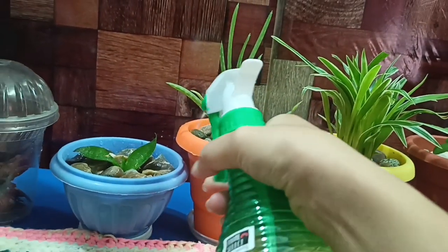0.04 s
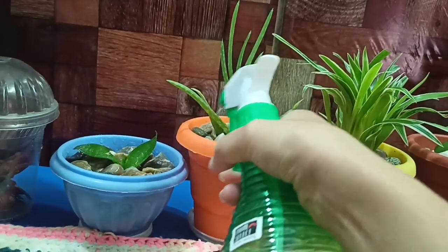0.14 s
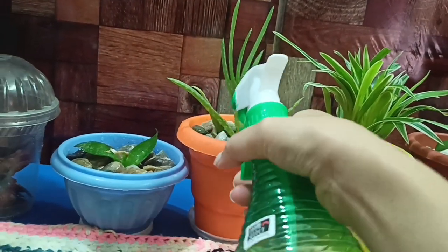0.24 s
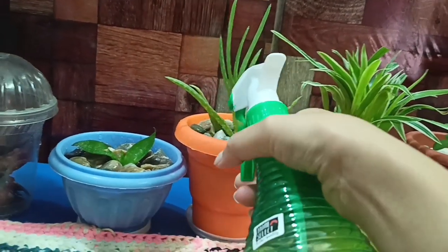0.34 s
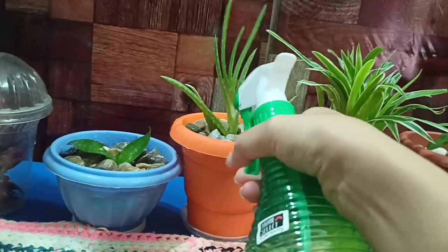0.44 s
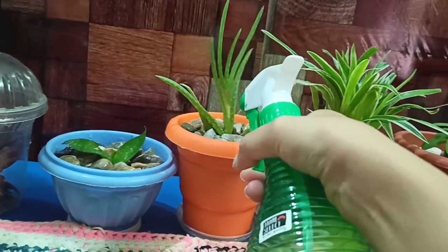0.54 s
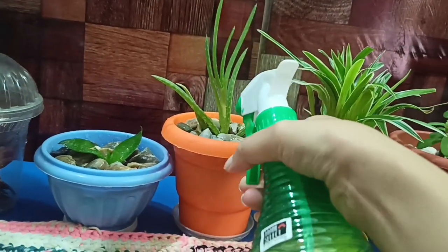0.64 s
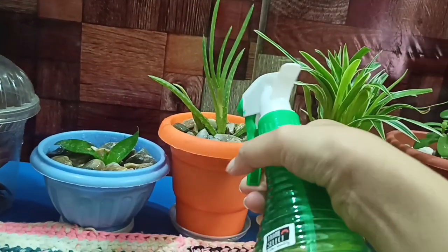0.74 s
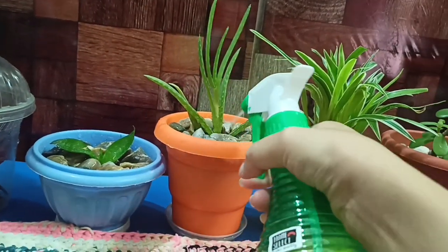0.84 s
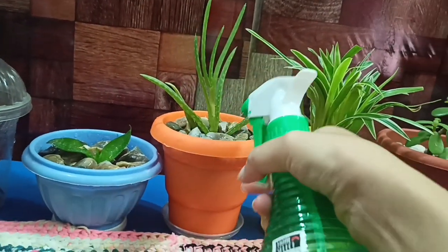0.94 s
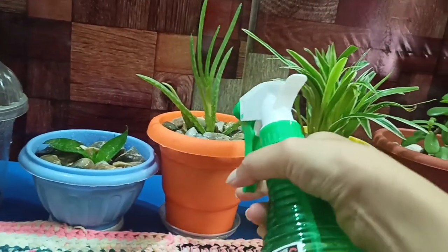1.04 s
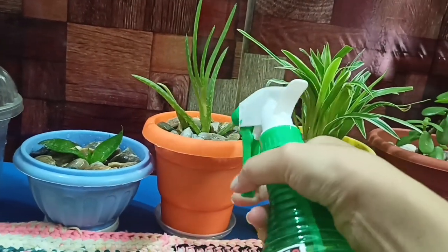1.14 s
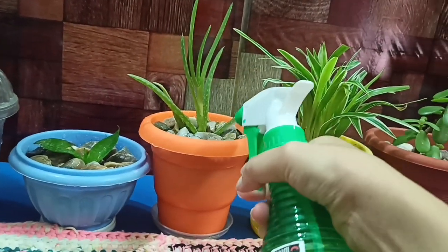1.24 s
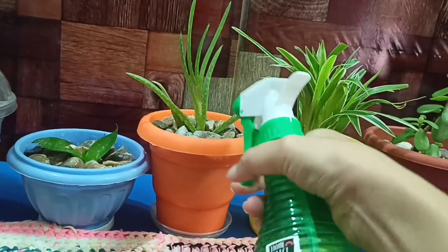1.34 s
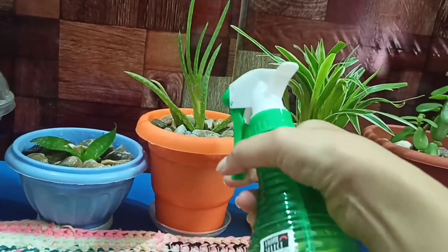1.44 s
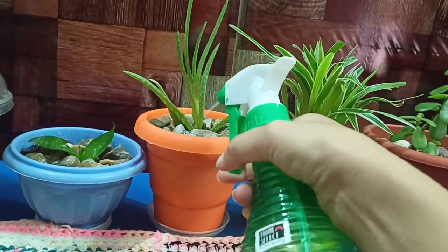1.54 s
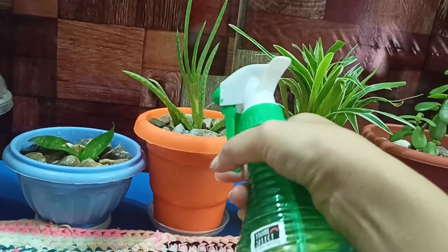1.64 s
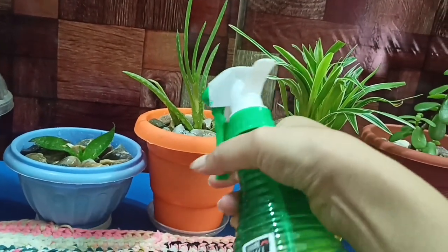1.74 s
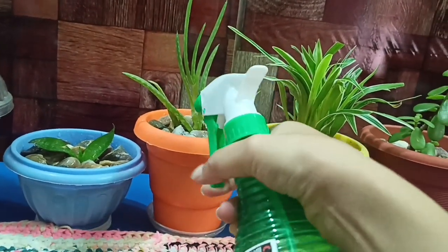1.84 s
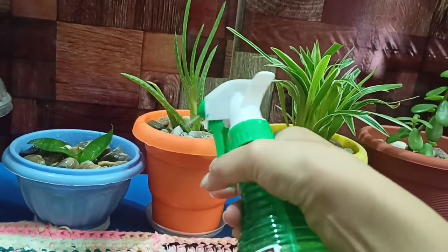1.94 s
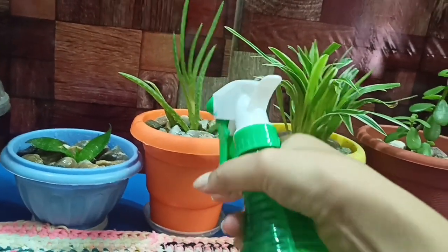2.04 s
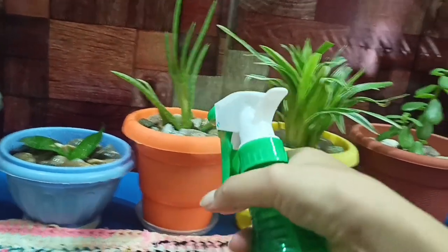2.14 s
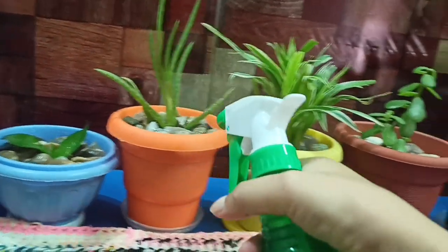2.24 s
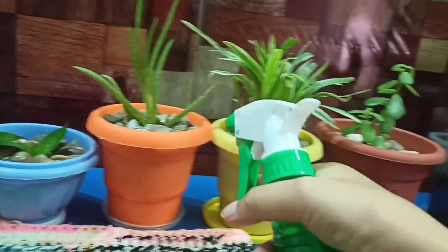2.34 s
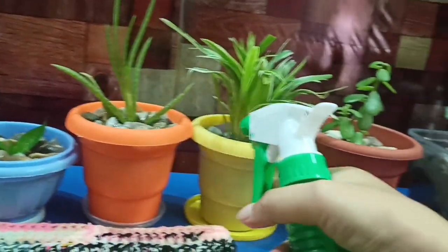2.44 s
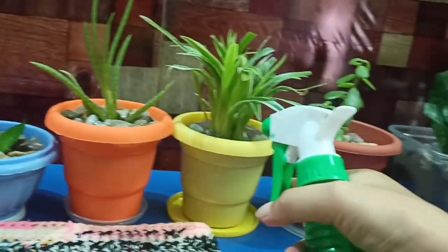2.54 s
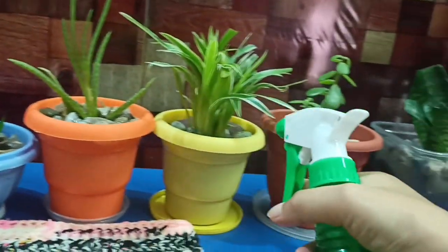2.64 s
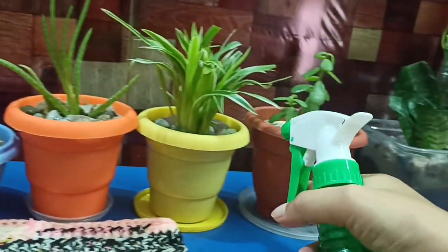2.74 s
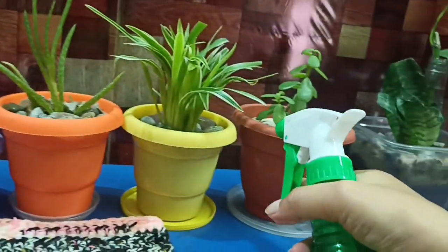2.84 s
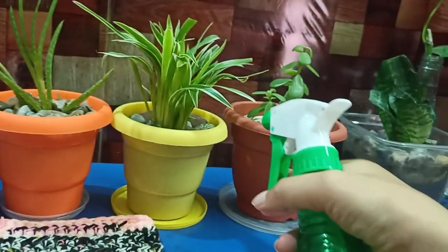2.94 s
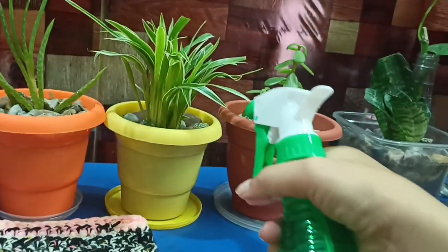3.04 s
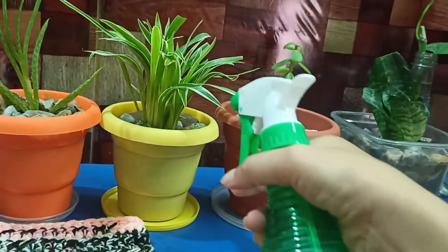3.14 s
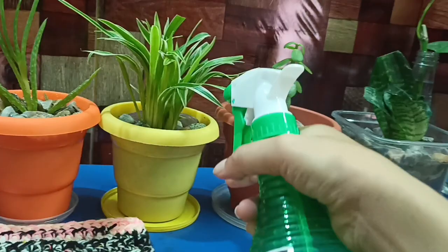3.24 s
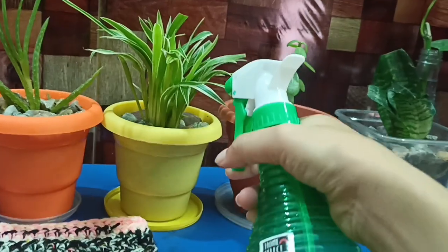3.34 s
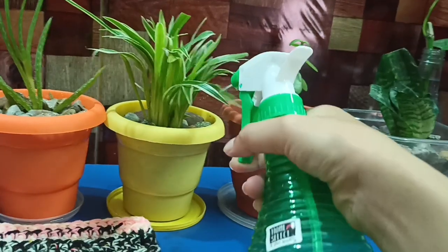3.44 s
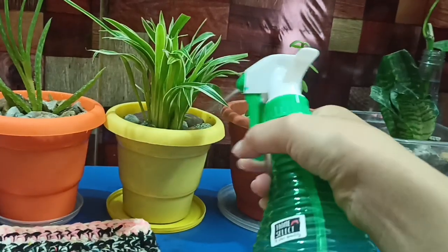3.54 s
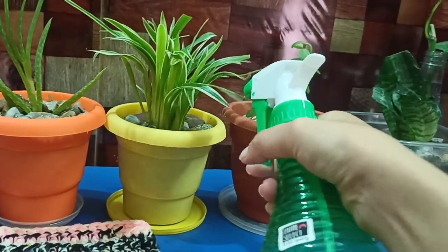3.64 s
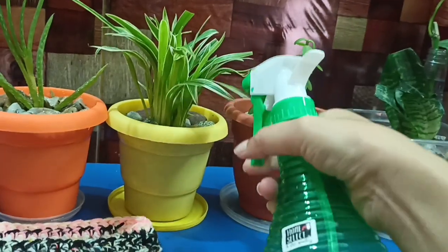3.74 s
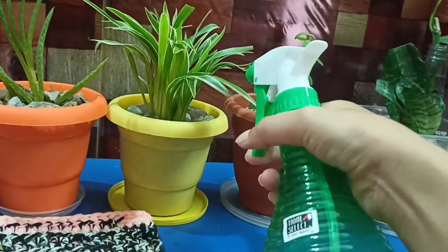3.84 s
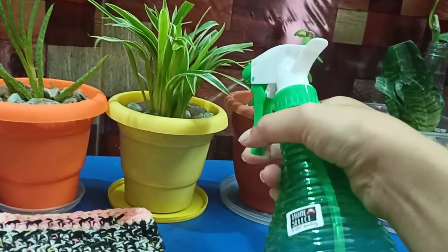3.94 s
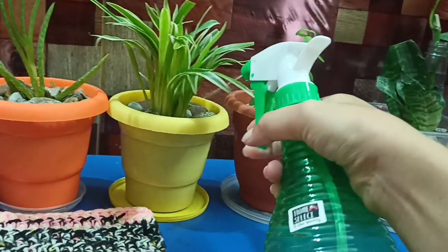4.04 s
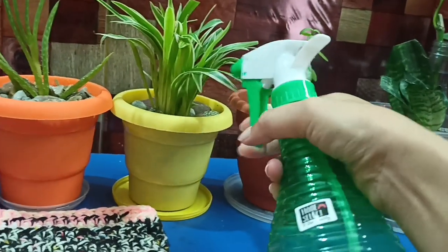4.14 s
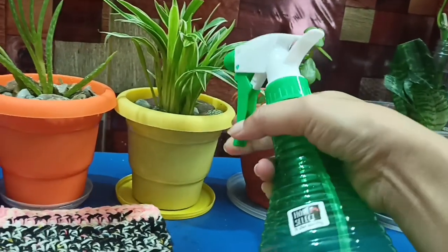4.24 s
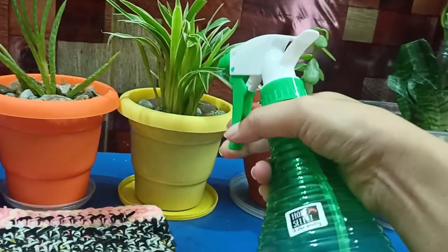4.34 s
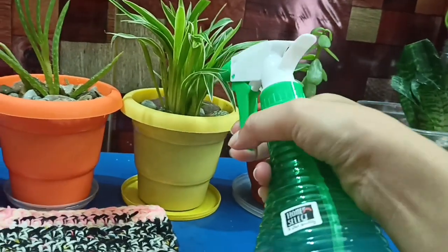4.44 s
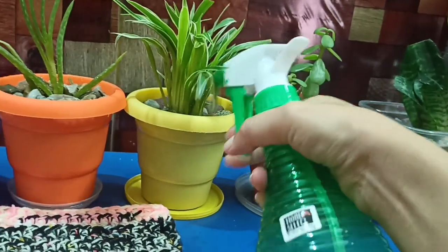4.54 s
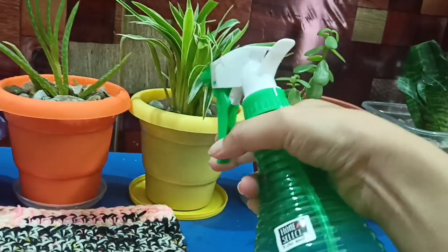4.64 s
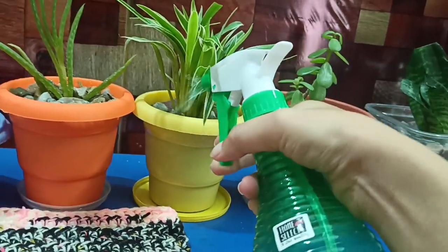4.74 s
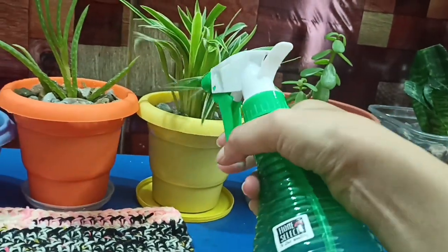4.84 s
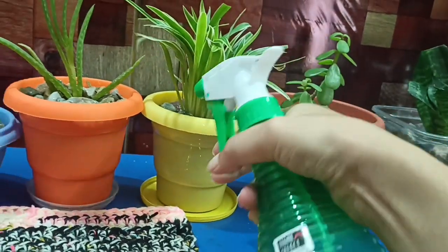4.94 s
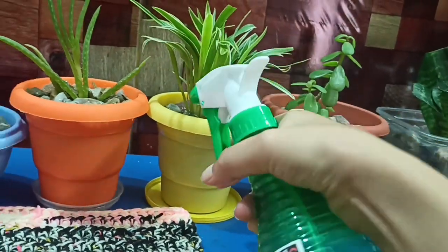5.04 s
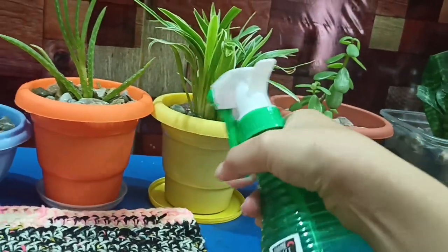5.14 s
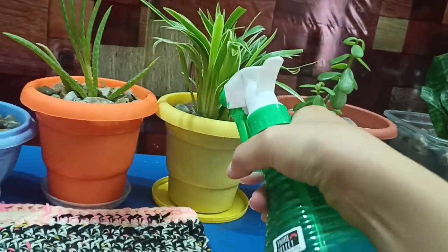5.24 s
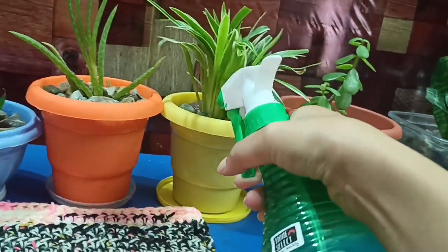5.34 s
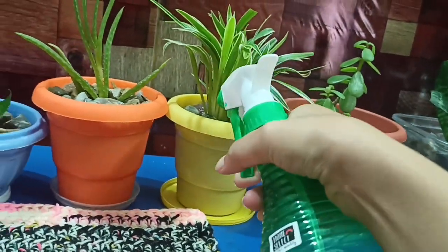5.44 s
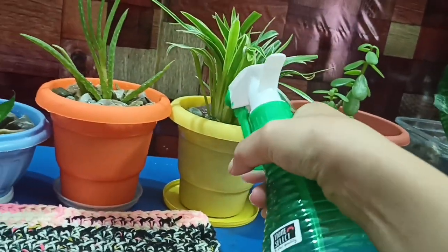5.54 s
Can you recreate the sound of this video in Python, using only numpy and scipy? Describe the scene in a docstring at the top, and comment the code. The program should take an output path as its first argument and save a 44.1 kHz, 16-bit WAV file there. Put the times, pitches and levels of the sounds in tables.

```python
"""Trigger sprayer on potted plants

A plastic trigger sprayer, held close to a phone's microphone, mists potted plants in a small room.
Trigger ticks are decaying sines with a rattle; the seal's slips are pulse trains that judder, then squeal;
nozzle hiss, wet splutter and two spells of patter on close leaves are shaped noise and random clicks.
Behind: mains hum, murmur and a far vehicle's drone; the phone turns the bass down when the treble is quiet."""
import sys
import numpy as np
from scipy import signal
from scipy.fft import rfft, irfft
from scipy.io import wavfile
from scipy.ndimage import uniform_filter1d

SR = 44100
rng = np.random.default_rng(int(sys.argv[2]) if len(sys.argv) > 2 else 0)


def nominal_scale(level):
    """Amplitude ratio for a level in decibels (scalar or array-like)."""
    x = np.asarray(level, float) / 20
    return 10 ** x


def generate_wav(signal):
    """Clip the signal to [-1, 1] and save it as 16-bit WAV at the path in sys.argv[1]."""
    frames = np.transpose(np.atleast_2d(signal))
    scaled = np.clip(frames, -1, 1) * 32767
    pcm = np.round(scaled).astype(np.int16)
    wavfile.write(sys.argv[1], SR, pcm)


N = 246519
T = np.arange(N) / SR


def unit(x):
    """Scale to rms 1."""
    return x / np.sqrt(np.mean(x ** 2))


def colour(x, points):
    """Causal minimum-phase filter through (Hz, dB) points, made by folding the cepstrum."""
    hz, db = np.transpose(points)
    log_gain = np.interp(np.log(np.arange(513) * SR / 1024 + 1), np.log(hz), db) * np.log(10) / 20
    fold = irfft(log_gain)
    fold[1:512] *= 2
    fold[513:] = 0
    return signal.fftconvolve(x, irfft(np.exp(rfft(fold))))[:N]


def noise(points):
    """Steady noise with the spectrum of (Hz, dB) points, rms 1."""
    hz, db = np.transpose(points)
    gain = nominal_scale(np.interp(np.log(np.fft.rfftfreq(N, 1 / SR) + 1), np.log(hz), db))
    return unit(irfft(rfft(rng.standard_normal(N)) * gain, N))


def band(x, lo_hz, hi_hz):
    """Band-pass."""
    return signal.sosfilt(signal.butter(2, [lo_hz, hi_hz], "bandpass", fs=SR, output="sos"), x)


def above(x, hz):
    """High-pass without delay."""
    return signal.sosfiltfilt(signal.butter(2, hz, "highpass", fs=SR, output="sos"), x)


def walk(rate):
    """Smooth random wander, rms 1; a higher rate wanders faster."""
    k = int(SR / rate)
    return unit(uniform_filter1d(uniform_filter1d(rng.standard_normal(N), k), k))


def drops(rate, spread_db):
    """Random clicks, rate per second, with a long-tailed size; rms 1."""
    hit = rng.random(N) < rate / SR
    sign = rng.choice([-1, 1], N)
    size = nominal_scale(spread_db * np.minimum(rng.exponential(size=N), 5))
    return unit(hit * sign * size)


def pulls(tables, column, rest, edge=.002):
    """Join one column of several tables over time, resting between them."""
    rows = []
    for table in tables:
        rows.append((table[0][0] - edge, rest))
        rows += [(row[0], row[column]) for row in table]
        rows.append((table[-1][0] + edge, rest))
    return np.interp(T, *np.transpose(rows))


def tone(hz):
    """Sine that follows a pitch curve, rms 1."""
    return np.sqrt(2) * np.sin(2 * np.pi * np.cumsum(hz) / SR)


# the small room's murmur: pitch_hz, relative density_db [dB per Hz]
MURMUR_SPECTRUM = [(26, -58), (45, -19), (75, -21.5), (86, -10.5), (108, -2.5), (171, -9.5), (221, -8),
                   (327, -12), (416, -9), (551, -18), (762, -17.5), (1300, -38), (1690, -74), (2860, -120)]
# what lies under the sprayer: start_s, murmur_db (before a small trim), hum_db, hand_db
ROOM_LEVELS = [(0, -54, -55.5, -74), (.3, -48, -55, -67), (2.2, -49, -56.5, -60), (2.499, -47, -47, -66),
               (3.05, -50, -50.5, -70), (3.45, -45.5, -61, -81), (3.7, -46.5, -50, -61),
               (5.59, -49.5, -58, -67)]


def murmur():
    """Low room murmur: shaped noise whose level wanders."""
    s, level_db, _, _ = np.transpose(ROOM_LEVELS)
    return noise(MURMUR_SPECTRUM) * nominal_scale(np.interp(T, s, level_db) - 0.5 + 1.41 * walk(20))


# treble floor: pitch_hz, relative density_db [dB per Hz]
AIR_SPECTRUM = [(650, -32), (1100, -3), (1280, -3), (1830, -1), (2440, -14), (2660, -10), (5170, -11.5),
                (7960, -16), (8890, -11), (11800, -22), (15400, -17)]
# how the treble floor wavers: start_s, level_db
AIR_LEVELS = [(0, -60.5), (2.3, -66), (2.42, -71), (2.5, -63), (2.95, -64.5), (3.0, -62.5), (3.08, -68.5),
              (3.4, -64.5), (5.59, -63)]


def treble_floor():
    """Thin steady-coloured noise whose level wavers."""
    return noise(AIR_SPECTRUM) * nominal_scale(np.interp(T, *np.transpose(AIR_LEVELS)))


def mains_hum():
    """One low tone wavering in pitch and level."""
    s, _, level_db, _ = np.transpose(ROOM_LEVELS)
    centre_hz, waver_hz = 98.8, 3.0
    hum = tone(centre_hz + waver_hz * walk(12))
    return hum * nominal_scale(np.interp(T, s, level_db) + 2.5 * walk(14))


def hand_rumble():
    """The hand on the phone: noise mostly between 50 and 70 Hz."""
    s, _, _, level_db = np.transpose(ROOM_LEVELS)
    rumble = noise([(30, -56.0), (42, -33), (50, -7), (70, -6.0), (85, -29.0), (200, -74)])
    return rumble * nominal_scale(np.interp(T, s, level_db))


# trigger ticks, sounding 0.41 ms after start_s: start_s, relative tick_db, pitch_hz, relative knock_db
TRIGGER_TICKS = [(0.05, -37, 6210, -59), (0.0815, -19, 6500, -54), (0.1029, -23, 7240, -52),
                 (0.421, -33, 6000, -74), (0.461, -15.5, 6300, -61), (0.4853, -10.5, 7540, -56),
                 (0.4964, -17, 6120, -67), (0.805, -33, 6160, -64), (0.837, -15.5, 6500, -46),
                 (0.849, -33, 6870, -52), (1.1807, -31.5, 6500, -67), (1.2089, -13, 6230, -60),
                 (1.2155, -35, 6200, -55.5), (1.537, -33, 4820, -68), (1.568, -24, 4940, -56),
                 (1.9151, -10, 6330, -40.5), (2.2752, -39, 4880, -76), (2.9725, -41.5, 7230, -53),
                 (4.3978, -39, 4840, -66), (4.42, -16, 6180, -48), (4.4275, -44, 5940, -61),
                 (4.802, -12.5, 6250, -41), (4.8068, -33.5, 6850, -41.5), (4.8126, -21, 6770, -38.5),
                 (5.1862, -10, 6965, -41), (5.1951, -10.5, 6520, -35.5), (5.2013, -25.5, 6430, -30.5),
                 (5.5205, -37, 4730, -59), (5.5455, -12.5, 7320, -68), (5.5516, -10.5, 7240, -32.5)]
# the bottle's ringing modes: pitch_hz, relative level_db, t60_s
BOTTLE_MODES = [(275.8, -5.5, 0.25), (582, -1, 0.056), (1254, -1.5, 0.018)]


def trigger():
    """A sharp tick on the plastic, a short rattle after it and a dull knock through the bottle."""
    out, t = np.zeros(N), np.arange(4096) / SR
    knock = sum(nominal_scale(db - 60 * t / t60) * np.sin(2 * np.pi * hz * t) for hz, db, t60 in BOTTLE_MODES)
    for s, tick_db, hz, knock_db in TRIGGER_TICKS:
        grit = rng.standard_normal(len(t))
        tick = np.sin(2 * np.pi * hz * t) * np.exp(-t / 0.00045)
        rattle = 0.29 * band(grit, 3240, 10000) * np.exp(-t / 0.0083)
        hit = nominal_scale(tick_db - 7.0) * (tick + rattle) + nominal_scale(knock_db - 3.0) * knock
        i = int((s + 0.00041) * SR)
        out[i:i + len(t)] += hit[:N - i]
    return out


# the nozzle opens on the slow stroke: start_s, hiss_db, splutter_db, swell_db (rise until the surge)
NOZZLE_OPENINGS = [(.103, -37, -37.5, 6.5), (.484, -33, -35, -2), (.863, -33, -35, -3.5),
                   (1.229, -36, -34.5, -5.5), (1.591, -38.5, -37, 4), (1.928, -38, -32, -3),
                   (3.471, -42, -47, 12), (4.004, -36.5, -33.5, 1.5), (4.446, -42, -37.5, 8.5),
                   (4.827, -39, -37, 4.5), (5.212, -39.5, -35.5, -0.5), (5.564, -37, -37, -2)]
# full pressure: start_s, shut_s, hiss_db, splutter_db, trickle_s (runs dry this long after closing, at most)
PRESSURE_SURGES = [(.152, .214, -26, -30, 0.21), (.525, .6, -21.5, -25.5, 0.15),
                   (.914, .98, -22, -28, 0.13), (1.268, 1.345, -22, -28, 0.11),
                   (1.66, 1.733, -31.5, -34, .13), (1.95, 2.04, -21.5, -27, 0.18),
                   (3.628, 3.7, -18.5, -27.5, 0.275), (4.066, 4.2, -33, -31.5, 0.1),
                   (4.482, 4.562, -29, -27.5, 0.18), (4.862, 4.93, -20, -24, 0.17),
                   (5.254, 5.335, -22.5, -28.5, .13)]


def flow(k):
    """Level in dB of hiss (k=0) or splutter (k=1): spurt, slow flow, surge, shut, drip, dry."""
    open_s, spurt_s, surge_s, shut_s, drip_s = 0.0075, 0.02, 0.01, 0.044, 0.028
    crest = 0.6  # share of the surge
    # dB against the row's level
    crack_db = -14
    spurt_db, surge_db, late_db = (1.5, 4)[k], (-7.5, 0.7)[k], (-9, 0.7)[k]
    # dB after the stroke
    shut_db, drip_db, dry_db = (-40.5, -51.5)[k], (-49, -44)[k], (-82, -76)[k]
    rows = [(0, dry_db)]
    for i, (s, *slow, swell) in enumerate(NOZZLE_OPENINGS):
        # the last opening is cut off by the end before it surges
        surge, shut, *full, trickle = PRESSURE_SURGES[i] if i < len(PRESSURE_SURGES) else (N / SR, 0, 0, 0, 0)
        rows += [(s - open_s / 2 - .001, dry_db),
                 (s - open_s / 2, slow[k] + crack_db),
                 (s + open_s / 2, slow[k] + spurt_db),
                 (min(s + spurt_s, (s + surge) / 2 + open_s), slow[k]),
                 (surge, slow[k] + swell)]
        if shut:
            closed = shut + shut_s
            dry_s = min(closed + trickle, NOZZLE_OPENINGS[i + 1][0] - open_s)
            rows += [(surge + surge_s, full[k] + surge_db),
                     (surge + crest * (shut - surge), full[k]),
                     (shut, full[k] + late_db),
                     (closed, shut_db),
                     (closed + drip_s, drip_db),
                     (dry_s, dry_db)]
    return np.interp(T, *np.transpose(sorted(rows)))


# air at the nozzle: pitch_hz, relative density_db [dB per Hz]
HISS_SPECTRUM = [(7000, -15.5), (9000, -27), (11000, -11), (12400, -5), (13700, 4), (14600, -14.5),
                 (15400, -1.5)]
# torn water at the nozzle: pitch_hz, relative density_db [dB per Hz]
SPLUTTER_SPECTRUM = [(600, -23), (1200, -24), (2000, -19), (3100, -13), (4300, -4.5), (5500, -4.5),
                     (6700, 2.5), (7800, -2.5), (9500, -11.5), (12000, -24.5)]


def nozzle():
    """Air hisses as noise, torn water splutters as dense clicks; both run quieter while the seal squeals."""
    hush_db = -8.5
    sputter_db = 1.5 * walk(200) + 1.2 * walk(40)
    hiss = noise(HISS_SPECTRUM) * nominal_scale(flow(0))
    splutter = unit(colour(drops(9000, spread_db=2.0), SPLUTTER_SPECTRUM)) * nominal_scale(flow(1))
    squealing = 1. * (pulls(strokes(), 1, 700, edge=.0004) > 950)
    squealing = uniform_filter1d(squealing, size=200)
    return (hiss + splutter) * nominal_scale(sputter_db + hush_db * squealing)


# slow strokes: start_s, end_s, from_hz, to_hz, relative level_db, swell_db (change by the end),
# first_db (gain of the first partial at the end)
SEAL_JUDDERS = [(.104, 0.154, 667, 732, -53.5, 2, 8.5), (.484, 0.527, 703, 741, -47, 0, -2),
                (.862, 0.916, 697, 715, -47.5, -1.5, 2), (1.229, 1.269, 706, 701, -43.5, -1, -5),
                (1.591, 1.661, 707.5, 775.5, -54.5, 4, 6), (1.699, 1.742, 731, 705, -55, -6, 6),
                (1.929, 1.951, 685, 738, -51, -3, 3), (3.472, 3.529, 613, 607, -49.5, 10, -3),
                (3.531, 3.564, 605.6, 734, -40, 3.5, -4), (3.564, 3.625, 708, 681, -49, -5, 7),
                (3.998, 4.068, 686.7, 678, -44.5, 3, -1.5), (4.066, 4.199, 678.5, 665, -40, -2, -2.5),
                (4.445, 4.477, 668, 670, -36.5, -7, -6), (4.826, 4.861, 670, 715, -49, -2.5, 1),
                (5.207, 5.257, 697, 697, -40.5, -9, 0), (5.565, 5.599, 684, 690, -39, -14, 4)]
# fast strokes: start_s, length_s, caught_hz, top_hz, let_go_hz, relative level_db, first_db (first partial's gain)
SEAL_SQUEALS = [(0.15, .06, 1255, 1299, 1225, -42, 6), (0.526, .077, 1281, 1366, 1262, -39, 4.5),
                (0.915, .07, 1297, 1326, 1275, -41, 6), (1.271, 0.074, 1296, 1379, 1231, -40, 5),
                (1.665, .032, 1077, 1124, 1007, -45, 3.5), (1.954, .089, 1333, 1415, 1330, -39.5, 5.5),
                (3.63, .066, 1267, 1295, 1288, -43, 7.5), (4.484, .084, 1307, 1402, 1298, -37.5, 3.5),
                (4.864, .074, 1314, 1340, 1207, -43, 8), (5.253, .082, 1318, 1397, 1243, -42.5, 9)]


def strokes():
    """Rows (s, slip Hz, dB, roughness, first partial dB) per stroke; a squeal arches with the hand's speed."""
    judder_rough, squeal_rough, slip_off_rough, die_rough = .18, .085, .22, .9
    first_grows_db = 9  # the first partial builds up through a judder
    caught, top, let_go = .11, .45, .87  # shares of a squeal's length
    catch, slip_off = .8, .83  # pitch ratios before it is caught and after it lets go
    die_hz, die_s = 747.6, .008
    catch_db, arch_db, slip_off_db, die_db = -6, 1.7, -10.5, -19
    tables = []
    for s, end, hz, to_hz, db, swell, first in SEAL_JUDDERS:
        tables.append([(s, hz, db, judder_rough, first - first_grows_db),
                       (end, to_hz, db + swell, judder_rough, first)])
    x = np.linspace(-1, 1, num=13)
    for s, length, in_hz, top_hz, out_hz, db, first in SEAL_SQUEALS:
        share = top + x * np.where(x < 0, top - caught, let_go - top)
        hz = top_hz - x ** 2 * (top_hz - np.where(x < 0, in_hz, out_hz))
        arch = [(s + u * length, f, db - arch_db * a, squeal_rough, first)
                for u, f, a in zip(share, hz, x ** 2)]
        start = [(s, catch * in_hz, db + catch_db, squeal_rough, first)]
        end = [(s + length, slip_off * out_hz, db + slip_off_db, slip_off_rough, first),
               (s + length + die_s, die_hz, db + die_db, die_rough, 0)]
        tables.append(start + arch + end)
    return sorted(tables)


# how the spray head radiates the slips: pitch_hz, gain_db
HEAD_RESPONSE = [(500, -9), (1350, -4), (2100, 3), (2700, -4.5), (4000, -0.5), (5400, 9), (6800, 11.5),
                 (8200, 3.5), (9600, -5.5), (11000, -10.5), (12500, 3), (13800, 12), (15200, 6)]
# a hard squeeze throws the squeal up for a moment: start_s, length_s, rise_hz
SQUEEZE_LEAPS = [(1.984, .024, 125.7)]


def seal():
    """Stick-slip pulses of the piston seal: even in the squeal, of wandering length and size in the judder."""
    tables = strokes()
    hz, db, rough, first_db = (pulls(tables, k + 1, rest, edge=.0004)
                               for k, rest in enumerate((700, -120, .9, 0)))
    leap = sum(up * (T > s) * (T < s + length) for s, length, up in SQUEEZE_LEAPS)
    hz = uniform_filter1d(hz, size=120) + uniform_filter1d(leap, size=300)
    slow = np.clip((1000 - hz) / 200, 0, 1)  # 1 in the judder, 0 in the squeal
    phase = 2 * np.pi * np.cumsum(hz * (1 + .05 * rough * walk(400) + .0015 * walk(60))) / SR
    slips = nominal_scale(first_db) * np.cos(phase)
    # each partial flickers on its own, the upper ones more; the judder is softer in the upper partials
    flicker_db, soft_db = 1.15, 7
    second_db = -5.5  # on the second and third partials, times 1.5 in the squeal and 0.5 in the judder
    for k in range(2, 25):
        partial_db = np.log2(k) * (flicker_db * walk(120) - soft_db * slow)
        partial_db = partial_db + second_db * (k < 4) * (1.5 - slow)
        slips = slips + np.cos(k * phase) * nominal_scale(partial_db) * (k * hz < 15500)
    # grit decays within each slip
    scrape = rough * 1.5 * rng.standard_normal(N) * np.exp(-(phase / (2 * np.pi) % 1) / 0.52)
    size_db = 3 * rough * walk(250)
    pulses = np.sqrt(2) * nominal_scale(db + size_db) * (slips + band(scrape, 2500, 15000))
    return colour(pulses, HEAD_RESPONSE)


# the valve ball chatters as the trigger springs back: start_s, level_db, length_s
VALVE_CHATTER = [(0.302, -43, 0.014), (0.689, -41, 0.012), (1.067, -44, 0.02), (1.416, -45.5, 0.017),
                 (1.797, -47, 0.011), (2.101, -42, 0.018), (4.296, -44.5, 0.013), (4.655, -38.5, 0.011),
                 (5.03, -45.5, 0.018), (5.425, -47.5, 0.016)]


def valve():
    """Short runs of irregular band-passed clicks."""
    gate = sum(nominal_scale(db) * (T > s) * (T < s + length) for s, db, length in VALVE_CHATTER)
    clicks = drops(1500, spread_db=2.5)
    return gate * unit(band(band(clicks, 2430, 8400), 1640, 10400))


# far vehicle: start_s, pitch_hz, level_db
VEHICLE_DRONE = [(2.36, 237, -49.5), (2.5, 234.7, -45.5), (2.7, 234.3, -42.5), (2.95, 229, -54),
                 (3.25, 232, -58)]


def far_vehicle():
    """A distant drone: one low tone that wavers in pitch and level."""
    s, hz, _ = np.transpose(VEHICLE_DRONE)
    drone = tone(np.interp(T, s, hz) + 6.7 * walk(34.8))
    return drone * nominal_scale(pulls([VEHICLE_DRONE], 2, -120, edge=0.065) + 1.2 * walk(14))


# the jet strikes leaves close by: start_s, length_s, level_db, slope_db_per_s
LEAF_BURSTS = [(3.528, .064, -44, -32), (3.599, 0.027, -32.5, -150), (3.645, 0.0076, -21.5, -600),
               (3.653, 0.02, -28, -40.5), (3.671, 0.041, -17, -250), (4.068, 0.071, -24.5, -190),
               (4.11, 0.036, -31.5, -85), (4.153, 0.073, -23.5, -143)]


def leaf_gain():
    """Gain of the patter: each burst strikes, slopes, stops and runs off."""
    strike_s, runoff_db, runoff_db_per_s = 0.0033, -6.5, -130
    power = 0
    for s, length, db, slope in LEAF_BURSTS:
        t = T - s
        burst_db = db + slope * t.clip(0)
        end_db = db + slope * length + runoff_db + runoff_db_per_s * (t - length)
        gain = np.clip(t / strike_s, 0, 1) * nominal_scale(np.where(t < length, burst_db, end_db))
        power = power + gain ** 2
    return np.sqrt(power)


# drops on leaves: pitch_hz, relative density_db [dB per Hz]
PATTER_SPECTRUM = [(800, -33), (1300, -13.5), (2100, -10.5), (2500, -1.5), (2850, 4), (3300, -3),
                   (4150, 0.5), (4900, -5), (6400, -11.5), (9000, -21), (12000, -25)]


def leaf_patter():
    """Drops drum on leaves: dense clicks, coloured, with a raspy level."""
    rasp_db = 2.3 * walk(120)
    return unit(colour(drops(6500, spread_db=2.5), PATTER_SPECTRUM)) * leaf_gain() * nominal_scale(rasp_db)


# brightness from pull to pull: start_s, mid_db (3.5-10 kHz gain), top_db (gain above 10 kHz)
PULL_BRIGHTNESS = [(.2, 1.5, -2), (.58, -0.5, -3), (.95, 2, 0), (1.3, -0.3, 0.8), (1.68, -0.8, -2.5),
                   (2.0, -4.5, 2.5), (3.65, 5, -2), (4.101, 0.5, -0.5), (4.521, -2.2, -2.5), (4.9, 1.5, 2),
                   (5.3, 1.4, 3.7)]


def brightness(x):
    """Tilt the sprayer's two treble ranges from pull to pull."""
    s, mid_db, top_db = np.transpose(PULL_BRIGHTNESS)
    bright, top = above(x, 3500), above(x, 10000)
    mid = nominal_scale(np.interp(T, s, mid_db)) * (bright - top)
    return x - bright + mid + nominal_scale(np.interp(T, s, top_db)) * top


def room_echo(x):
    """Small-room reverberation: noise decaying exponentially after a 3 ms gap."""
    t60_s, wet_db = 0.37, -9
    t = np.arange(SR // 2) / SR
    echo = rng.standard_normal(len(t)) * nominal_scale(-60 * t / t60_s) * (t > .003)
    return nominal_scale(wet_db) * signal.fftconvolve(x, echo / np.sqrt(np.sum(echo ** 2)))[:N]


def scene():
    """The close sprayer with its room echo, over the background."""
    near = brightness(seal() + nozzle() + leaf_patter() + trigger() + valve())
    sprayer = near + room_echo(near)
    background = murmur() + treble_floor() + mains_hum() + hand_rumble() + far_vehicle()
    return (sprayer + background)[None]


def band_limit(x):
    """A steep low-pass at the top of the band."""
    return signal.sosfilt(signal.butter(12, 16660, fs=SR, output="sos"), x)


def record(dry):
    """The phone's suppressor turns the bass down whenever the treble is quiet; filters cut both ends."""
    open_db, span_db, depth_db, smooth_s = -40.5, 26, -7.5, 0.018  # fully open above open_db of treble
    treble = above(dry, 900)
    k = int(smooth_s * SR)
    loud_db = 10 * np.log10(uniform_filter1d(uniform_filter1d(treble ** 2, k), k) + 1e-12)
    closed = np.clip((open_db - loud_db) / span_db, 0, 1)
    mix = treble + (dry - treble) * nominal_scale(depth_db * closed)
    mix = signal.sosfilt(signal.butter(4, 44, "highpass", fs=SR, output="sos"), mix)
    mix = signal.sosfilt(signal.ellip(10, .2, 60, 15500, fs=SR, output="sos"), mix)
    return band_limit(mix)


dry = scene()
out = record(dry)
generate_wav(out)
```